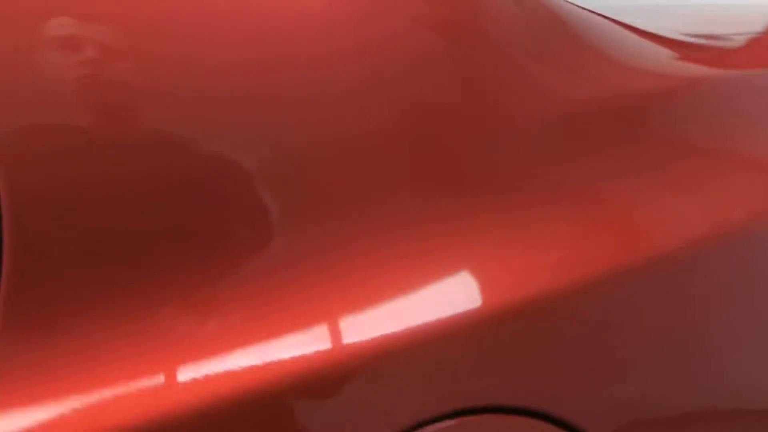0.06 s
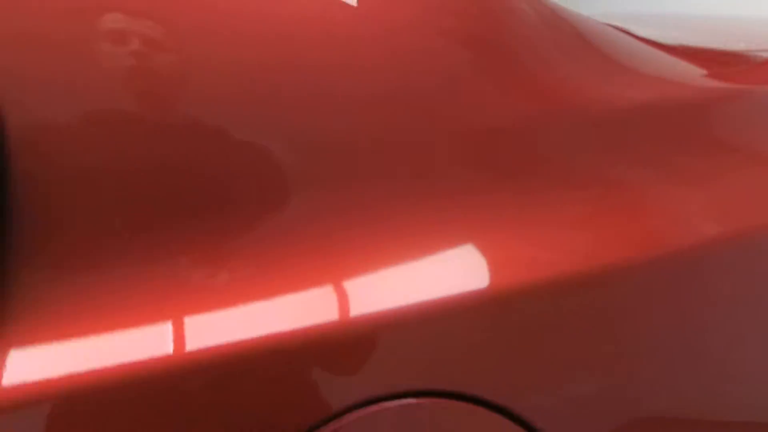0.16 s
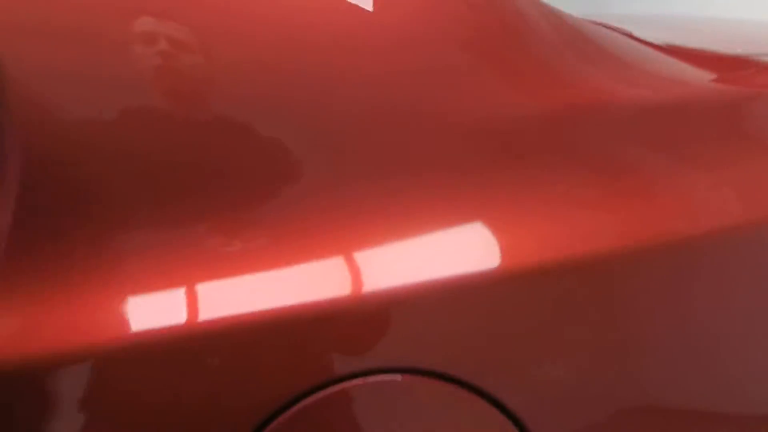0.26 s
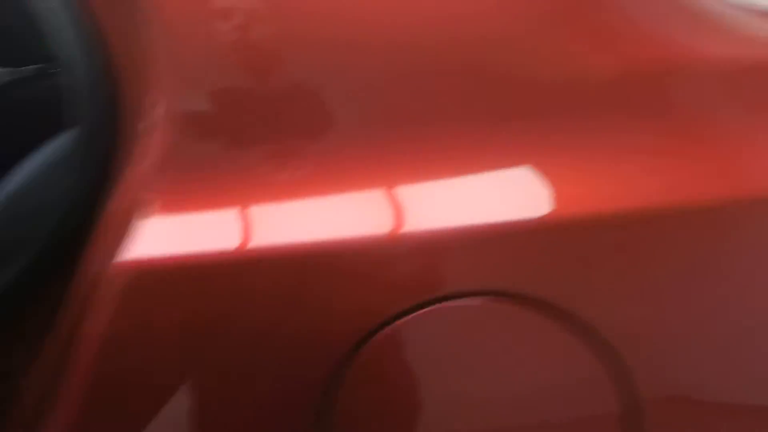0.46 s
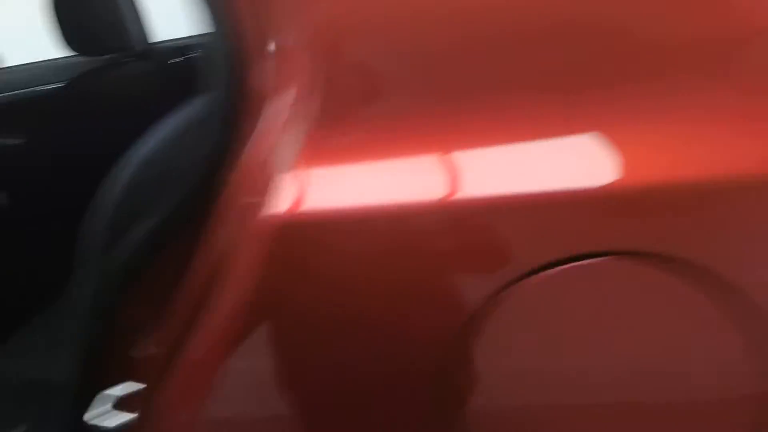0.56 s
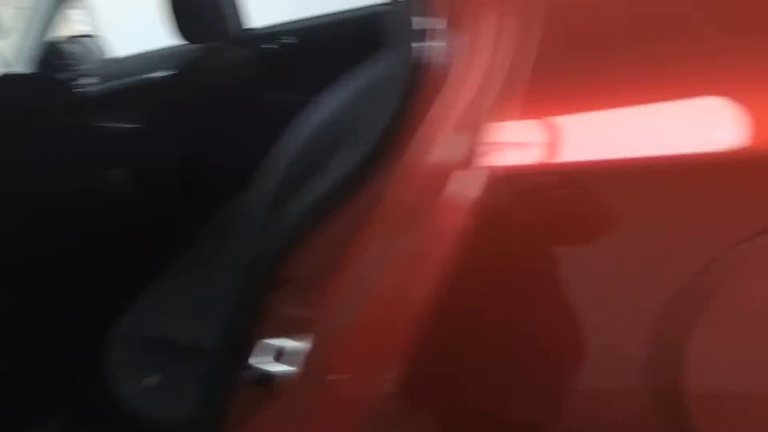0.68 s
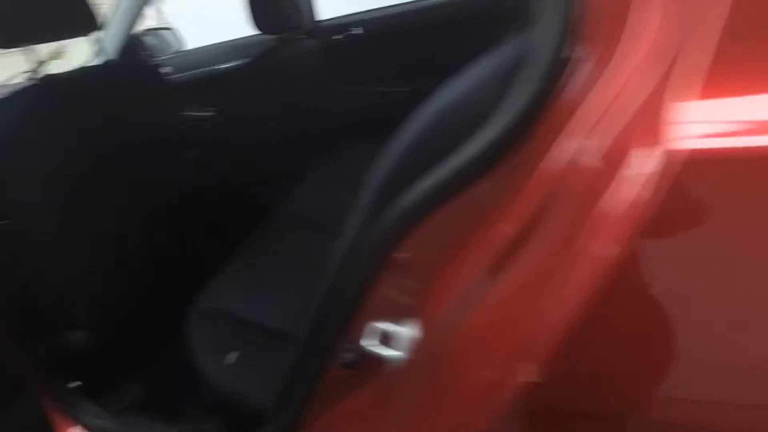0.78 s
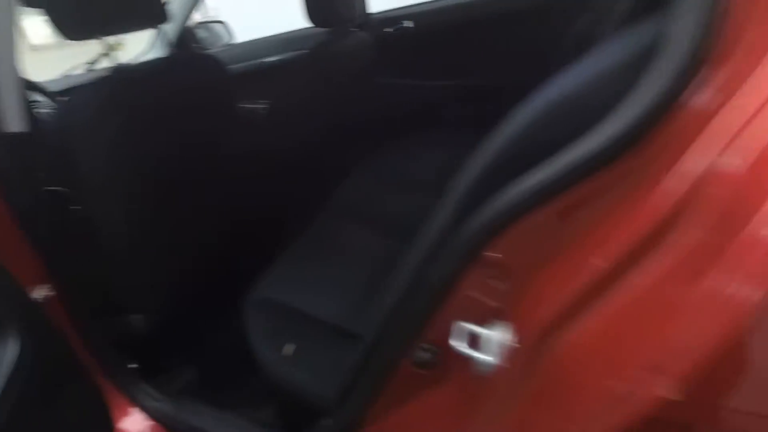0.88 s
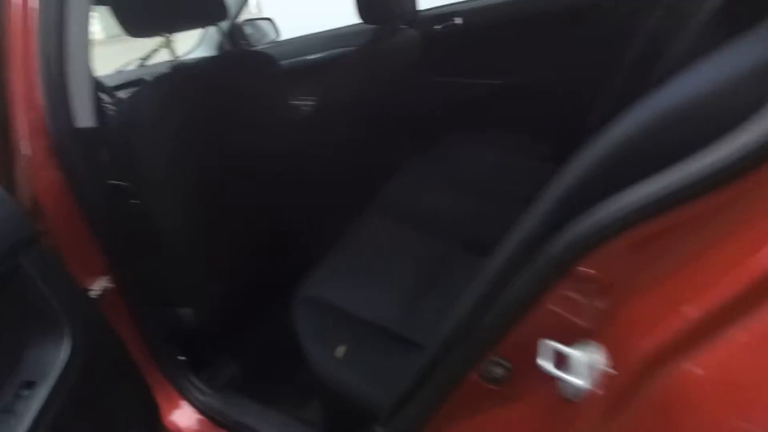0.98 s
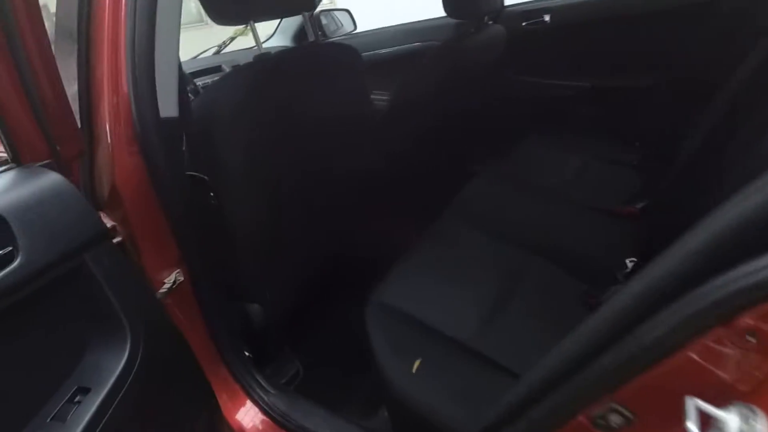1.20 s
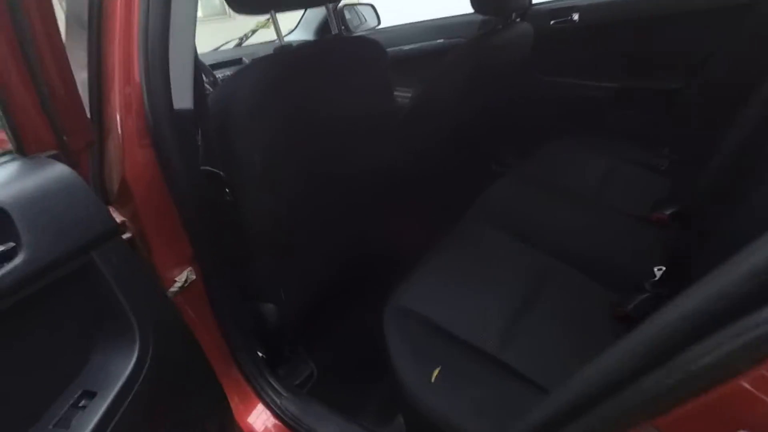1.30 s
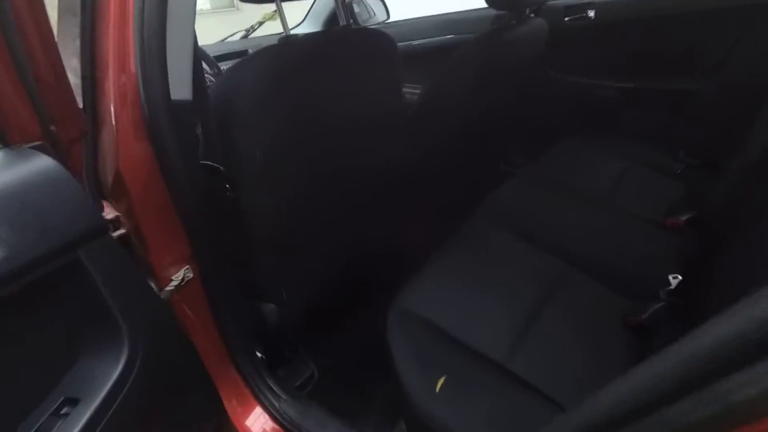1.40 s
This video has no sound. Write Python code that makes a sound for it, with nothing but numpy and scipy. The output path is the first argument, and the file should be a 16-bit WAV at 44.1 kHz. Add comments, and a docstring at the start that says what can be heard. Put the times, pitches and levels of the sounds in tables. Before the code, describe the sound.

One dull thump of a car door, with a click from the latch, sounds slightly to the left in a hall. Faint ticks follow, while ventilation rumbles softly and a far motor hums with a thin whine.

```python
"""One dull thump of a car door: the latch clicks, and the panel booms and rebounds in a large hall.
Cushioned blows excite the panel's damped modes; brief contacts of latch and trim give the click.
A few faint ticks and soft brushes of cloth are heard around it. Behind it, ventilation rumbles
and a distant motor hums, with a thin whine above."""
import sys
import numpy as np
from scipy import signal
from scipy.fft import rfft, irfft, next_fast_len
from scipy.io import wavfile
from scipy.ndimage import map_coordinates

SR = 44100
rng = np.random.default_rng(int(sys.argv[2]) if len(sys.argv) > 2 else 0)


def generate_wav(signal):
    """Clip the signal to [-1, 1] and save it as 16-bit WAV at the path in sys.argv[1]."""
    frames = np.transpose(np.atleast_2d(signal))
    scaled = np.clip(frames, -1, 1) * 32767
    pcm = np.round(scaled).astype(np.int16)
    wavfile.write(sys.argv[1], SR, pcm)


N = 63945

# blows on the door panel: t/s, level/dB, softness corner f/Hz
DOOR_BLOWS = [(.228, -16, 673), (.234, -1, 146), (.2464, -13.5, 234), (.2523, -8.5, 358),
              (0.2739, -23.5, 590), (0.2855, -7.5, 161), (0.3037, -21, 570), (0.325, -20.5, 189)]
# spectrum of a small hard contact: f/Hz, relative level/dB
TICK_SPECTRUM = [(500, -15), (2000, -2), (5000, 0), (9000, -2), (11500, -5), (14500, 2)]


def panel():
    """Modal superposition: rubber-cushioned blows ring the door panel; softer blows sound duller."""
    # panel modes: f/Hz, level/dB, T60/s
    resonances = [(155, -22, .26), (210, -1.5, .17), (258, 3, .19), (300, -4, .2), (347, -7.5, .2),
                  (500, -11.5, .09), (612, -19, .13), (740, -10.5, .18), (976, -10.5, .22), (1270, -16, .1),
                  (1677, -15, .11), (2008, -15, .13)]
    bass_cut_hz = 135  # the bass falls away steeply below this
    null_hz, null_width_hz = 117, 42

    def spectrum(f):
        s, u = 2j * np.pi * f, 1j * f / bass_cut_hz
        force = sum(amp(db) * np.exp(-s * start) / (1 + 1j * f / corner) ** 2
                    for start, db, corner in DOOR_BLOWS)
        modes = sum(amp(db) * 2 * np.pi * hz / ((s + np.log(1000) / t60) ** 2 + (2 * np.pi * hz) ** 2)
                    for hz, db, t60 in resonances)
        antiresonance = (null_hz ** 2 - f * f) / (null_hz ** 2 - f * f + 1j * f * null_width_hz)
        bass_cut = (u * u / (u * u + np.sqrt(2) * u + 1)) ** 2
        return -SR * force * modes * antiresonance * bass_cut
    return filtered(signal.unit_impulse(N), spectrum)


def latch():
    """Impact noise: each contact of latch and trim decays in its own band; one crack is broadband."""
    # contacts: t/s, level/dB, centre f/Hz, T60/s
    impacts = [(.2255, -26, 750, .02), (.2318, -20, 930, .024), (.2358, -22, 1450, .014),
               (.2405, -33, 1850, .09), (.258, -39, 850, .12), (.298, -38, 1050, .09),
               (.226, -47, 4000, .06), (.2323, -19.5, 4350, .009), (.238, -46, 4400, .11)]

    def band(centre, octaves=.22):
        return noise(lambda hz: -10 * np.log10(1 + (np.log2((hz + 1) / centre) / octaves) ** 4))
    contacts = sum(amp(db) * strike(start, t60, attack=.0005) * band(hz)
                   for start, db, hz, t60 in impacts)
    crack = amp(-35) * strike(start=.2315, t60=.03, attack=.000067) * rush(TICK_SPECTRUM)
    return contacts + crack


def shudder():
    """Dense vibrations merge into noise: trim and seals shake after the first blow."""
    # spectrum of the shaking: f/Hz, relative level/dB
    colour = [(25, -39), (60, -48), (100, -33), (150, -10), (250, 17.5), (450, 9), (700, -1), (1100, -5),
              (2000, -12), (4000, -26), (8000, -25), (15000, -34)]
    return amp(-26) * strike(DOOR_BLOWS[0][0], t60=.55, attack=.00067) * rush(colour)


def hall(x):
    """Reverberation: convolution with a diffuse tail whose treble dies sooner than its bass."""
    # reverberation time: f/Hz, T60/s
    decay_times = [(150, 0.58), (1000, 0.59), (4000, 0.28), (12000, 0.21)]
    hz, t, bands = signal.stft(noise(np.zeros_like), SR, nperseg=256)
    decay = np.exp(-np.log(1000) * t / along(decay_times, hz)[:, None])
    tail = signal.istft(bands * decay, SR)[1]
    return signal.fftconvolve(np.atleast_2d(x), tail / np.linalg.norm(tail[0]), axes=1)[:, :N]


def light_contacts():
    """Impact and friction: ticks and knocks start sharply, while brushing cloth swells and fades."""
    # small ticks: t/s, level/dB, T60/s
    ticks = [(.681, -42, 0.028), (.7775, -45.5, 0.018), (.902, -43, 0.026), (.9088, -37, .003)]
    # light knocks: t/s, level/dB, T60/s
    knocks = [(.6822, -37.3, .09), (.704, -44, .04)]
    # knock spectrum: f/Hz, relative level/dB
    knock_colour = [(200, -6), (1000, 0), (1700, 0), (2900, -2), (4000, -13), (5200, -8), (8000, -21),
                    (15000, -28)]
    # brushes of cloth: t/s, level/dB, Gaussian width/s
    brushes = [(0.099, -46.5, 0.079), (0.329, -41, 0.023), (0.522, -72, 0.022), (.925, -73, 0.027)]
    # cloth spectrum: f/Hz, relative level/dB
    cloth_colour = [(300, 20), (1700, 7.5), (4000, 1), (7000, -3), (12000, -7), (15000, -11)]

    def taps(rows):
        return sum(amp(db) * strike(start, t60, attack=.0001) for start, db, t60 in rows)
    tapping = taps(ticks) * rush(TICK_SPECTRUM) + taps(knocks) * rush(knock_colour)
    rubbing = sum(amp(db) * np.exp(-.5 * ((clock() - t) / width) ** 2) for t, db, width in brushes)
    return tapping + rubbing * rush(cloth_colour)


def ventilation():
    """Flow noise: a swelling low rumble under a nearly steady rush of air."""
    # rumble envelope: t/s, level/dB
    swells = [(0, -41.5), (.2, -40.5), (.38, -37), (.54, -44.5), (.6, -38), (.72, -38), (.82, -42.5),
              (.92, -46.5), (1.12, -45), (1.3, -46), (1.45, -43.5)]
    # rumble spectrum: f/Hz, relative level/dB
    rumble_colour = [(25, -14), (50, -45), (100, -12), (130, -9), (165, 1.5), (210, -2.5), (280, -2.5),
                     (380, -14.5), (520, -12.5), (900, -71)]
    # air spectrum: f/Hz, relative level/dB
    air_colour = [(45, -9), (100, 1), (300, 3.5), (600, 1), (1000, -3), (1500, -6), (2300, -13.5),
                  (3500, -10.5), (4500, -17), (6000, -18), (9000, -24.5), (12000, -26), (15000, -28.5)]
    rumble_db, = curves(swells)
    rumble = amp(rumble_db) * rush(rumble_colour)
    air = amp(-45 + .51 * wobble(9.8)) * rush(air_colour)
    return rumble + air


def motor():
    """Amplitude and phase modulation: a sinking hum flutters; a whine wavers differently at each ear."""
    # course of the hum: t/s, f/Hz, level/dB
    hum_track = [(0, 442.7, -38), (.17, 451.4, -40.5), (.21, 452.4, -58), (.24, 447, -37), (.45, 443, -36),
                 (.54, 441, -42), (.59, 444.5, -36), (.66, 439.4, -36.5), (.694, 442, -44),
                 (.742, 443.7, -35), (.79, 442.9, -46.5), (.83, 443, -40), (.885, 444.5, -58),
                 (.915, 444.3, -44.5), (.97, 438.3, -49), (1.02, 434.7, -36), (1.05, 434.4, -49.5),
                 (1.075, 432, -38.5), (1.18, 425.5, -41.5), (1.26, 421.7, -62), (1.305, 425, -37.5),
                 (1.335, 422.3, -48), (1.415, 420.3, -39.5), (1.45, 420, -41)]
    # whine partials: f/Hz, level/dB, share of the swell
    partials = [(2008, -72, 0), (2442, -65, .1), (2677, -73, 0), (2872, -74, .2), (2943, -66, .3),
                (3014, -62, .8), (3083, -73, .2), (3153, -73, 0), (3348, -64, .4)]
    # swell of the whine: t/s, level/dB
    swell = [(0, -5), (.6, -5), (.7, 3), (1, 2), (1.15, -1), (1.22, 9), (1.32, 9), (1.45, 0)]
    waver_hz, flutter_db, flutter_rate = 3, 1.2, 27
    hz, hum_db = curves(hum_track)
    swell_db, = curves(swell)
    cycles = np.cumsum(hz + waver_hz * wobble(flutter_rate)) / SR
    hum = amp(hum_db + flutter_db * wobble(flutter_rate)) * np.sin(2 * np.pi * cycles)

    def partial(f, db, flicker_db=1.5, drift_rad=.25):
        envelope = amp(db + flicker_db * wobble(11.9))
        return envelope * np.sin(2 * np.pi * f * clock() + drift_rad * wobble(15.15))
    whine = np.array([sum(partial(f, db + share * swell_db) for f, db, share in partials)
                      for ear in range(2)])
    return np.sqrt(2) * (hum + whine)


def noise(colour_db):
    """Interaural coherence: stereo noise of rms 1, near mono in the bass; colour_db maps Hz to dB."""
    # likeness of the ears: f/Hz, correlation
    coherence = [(30, 0.97), (150, 1), (500, 0.98), (1000, 0.97), (2000, 0.91), (4000, 0.37), (8000, -0.1),
                 (13000, 0.087)]

    def response(hz):
        angle = np.arccos(np.clip(along(coherence, hz), -1, 1)) / 2
        return amp(colour_db(hz)) * [np.cos(angle), np.sin(angle)]
    mid, side = filtered(rng.standard_normal((2, N)), response)
    ears = np.array([mid + side, mid - side])
    return ears / np.sqrt(np.mean(ears ** 2) + 1e-20)


def rush(colour):
    """Spectral shaping: stereo noise that follows rows of f/Hz, relative level/dB."""
    return noise(lambda hz: along(colour, hz))


def strike(start, t60, attack):
    """Exponential damping: a quick rise, then a fall of 60 dB in t60 seconds."""
    t = np.maximum(clock() - start, 0)
    return (1 - np.exp(-t / attack)) * np.exp(-np.log(1000) * t / t60)


def filtered(x, response):
    """Linear filtering: the spectrum of x times a frequency response."""
    size = next_fast_len(N + SR // 2)
    return irfft(rfft(x, size) * response(np.fft.rfftfreq(size, 1 / SR)), size)[..., :N]


def wobble(rate):
    """Random modulation: a smooth curve with rate knots a second."""
    return map_coordinates(rng.standard_normal(size=256), [clock() * rate], mode="wrap")


def curves(rows):
    """Linear interpolation: one value per sample for each column after the time."""
    times, *columns = np.transpose(rows)
    return [np.interp(clock(), times, column) for column in columns]


def along(points, hz):
    """Interpolation of (f/Hz, value) points on a logarithmic frequency axis."""
    f, values = np.transpose(points)
    return np.interp(np.log(hz + 1), np.log(f + 1), values)


def amp(db):
    """Decibels to amplitude ratio."""
    return 10 ** (np.asarray(db) / 20)


def clock():
    """Time of each sample in seconds."""
    return np.arange(N) / SR


def scene():
    """Superposition: the door's direct sound and reverberation over the background."""
    boom, click = panel(), latch()
    door = boom + click + shudder() + hall(amp(-21) * boom + amp(-10) * click)
    balance = amp([[.35], [-.35]])  # slightly to the left
    return (door + light_contacts() + ventilation() + motor()) * balance


def record(dry):
    """Saturation and band limiting: peaks are rounded, deep bass thinned and the top treble cut."""
    ceiling, knee = .32, 8
    low_cut_hz, top_hz = 85, 15500
    rounded = dry / (1 + np.abs(dry / ceiling) ** knee) ** (1 / knee)
    return filtered(rounded, lambda hz: (hz < top_hz) * hz / np.hypot(hz, low_cut_hz))


dry = scene()
out = record(dry)
generate_wav(out)
```